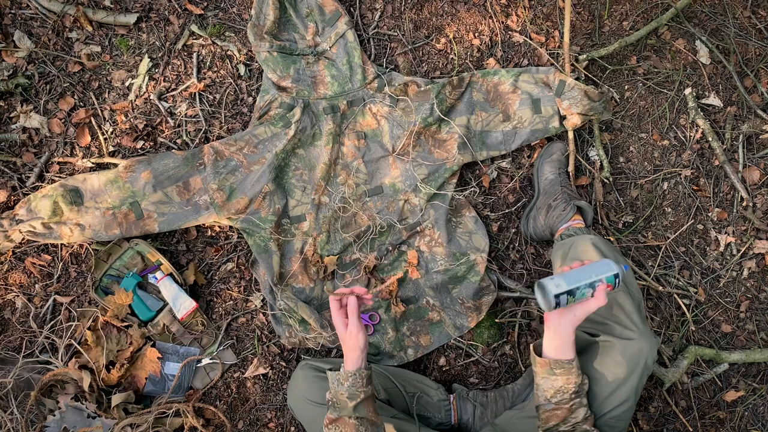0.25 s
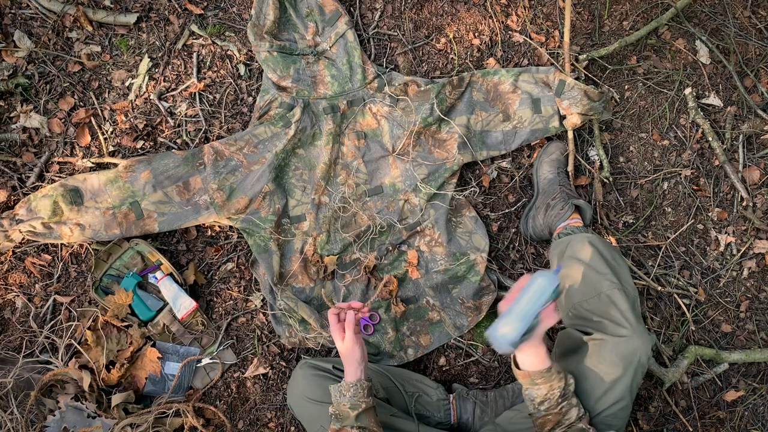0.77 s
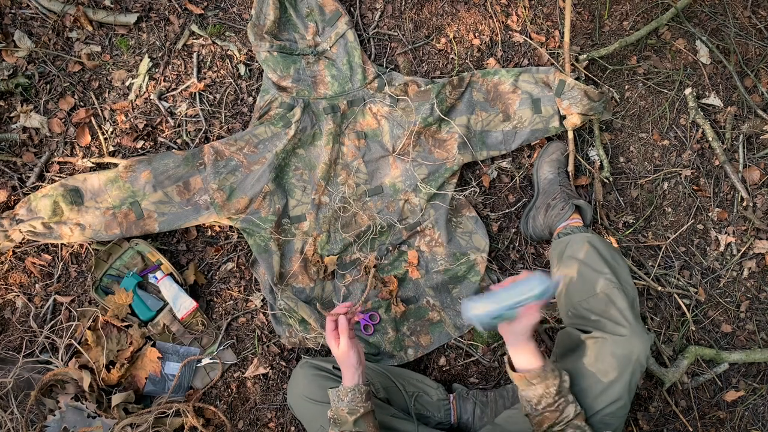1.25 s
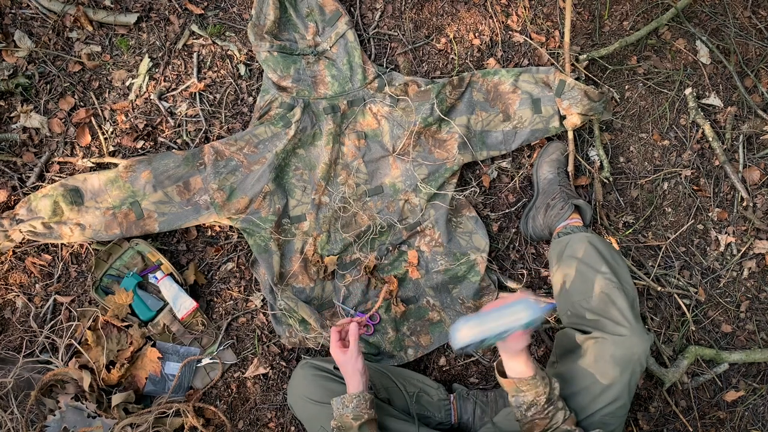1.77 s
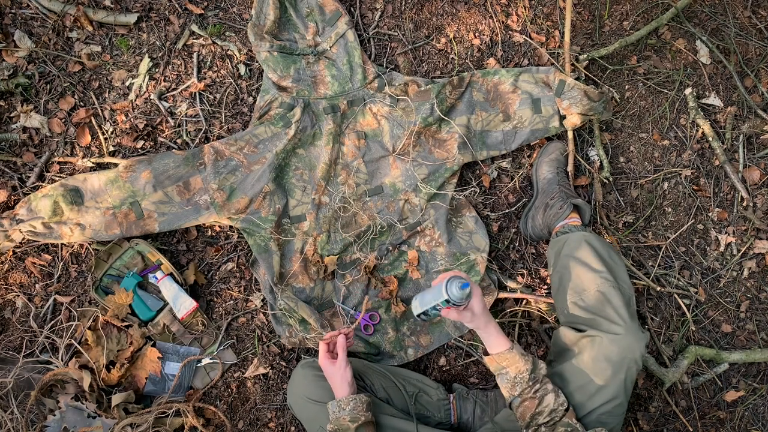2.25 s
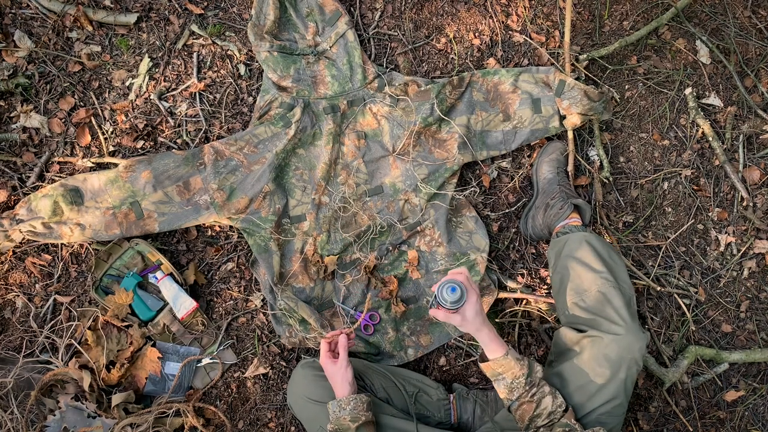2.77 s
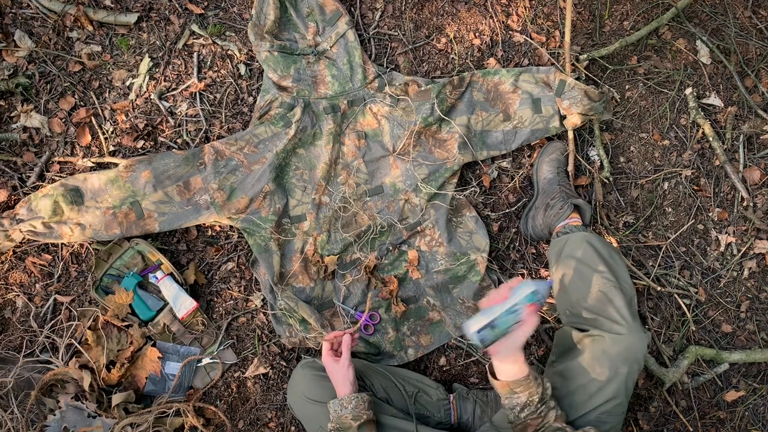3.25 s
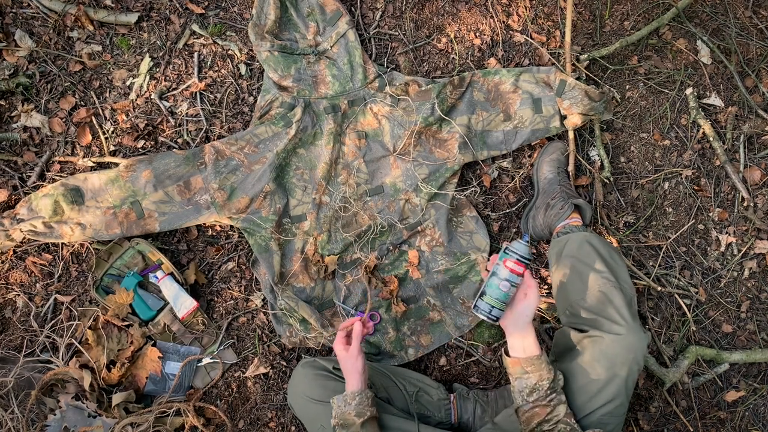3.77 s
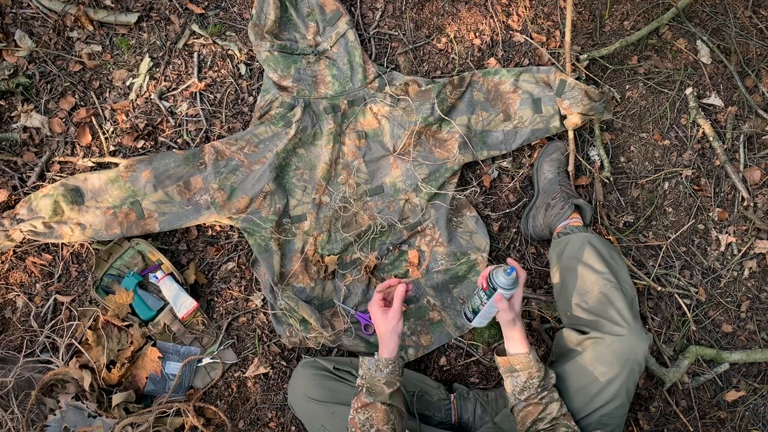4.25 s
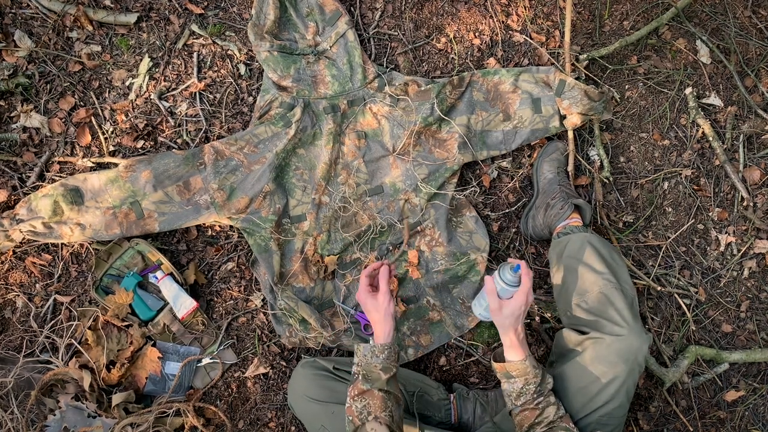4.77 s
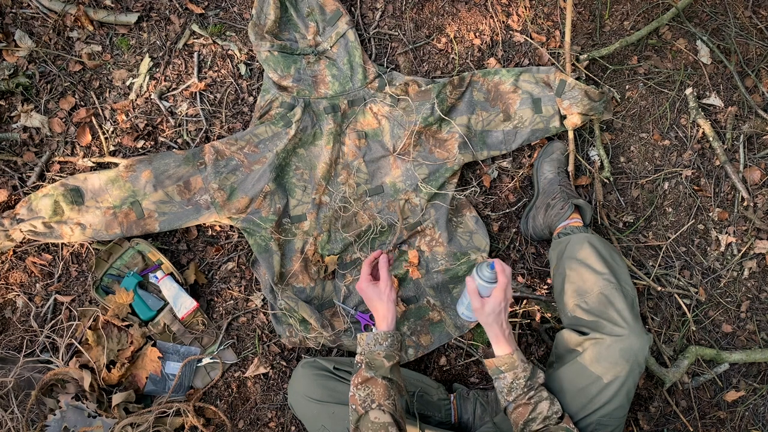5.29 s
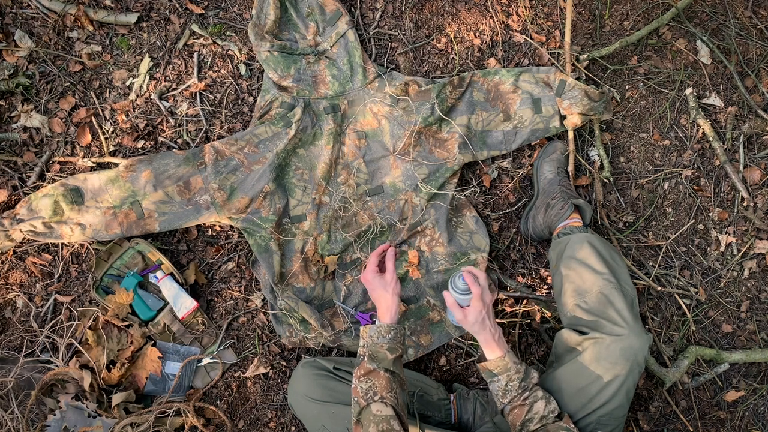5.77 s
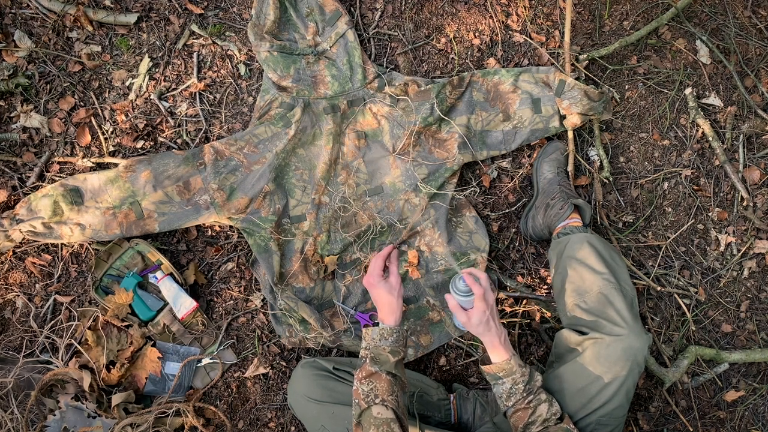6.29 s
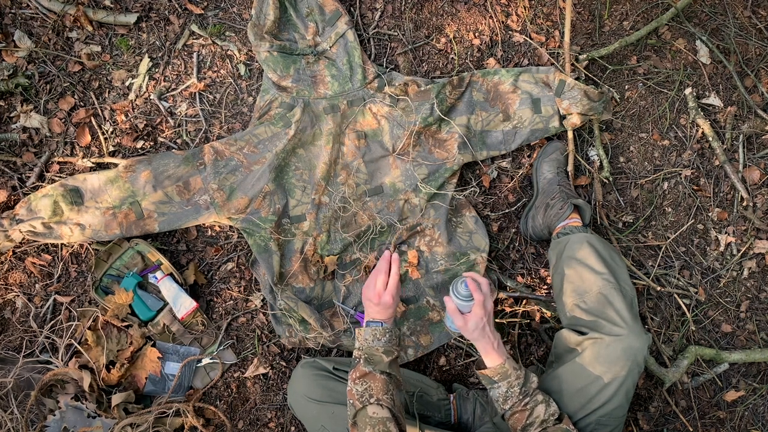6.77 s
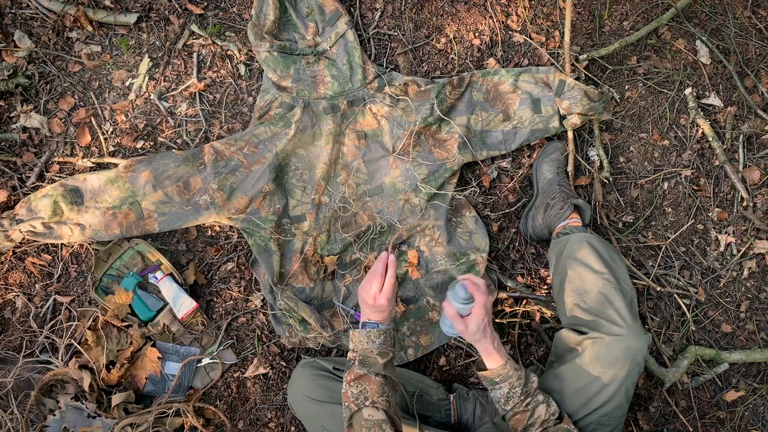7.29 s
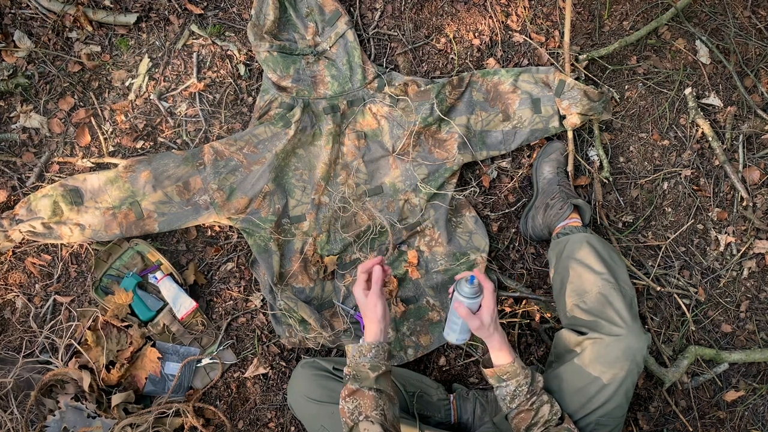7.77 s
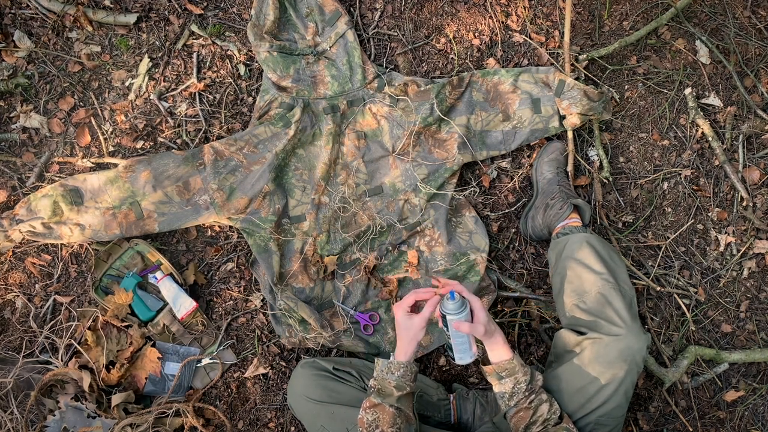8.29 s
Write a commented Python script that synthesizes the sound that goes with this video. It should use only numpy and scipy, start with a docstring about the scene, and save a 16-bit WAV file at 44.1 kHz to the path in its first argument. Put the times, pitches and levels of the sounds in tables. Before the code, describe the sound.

From the very start a spray can is shaken hard close to a small stereo microphone in quiet woodland. The mixing ball strikes with dense, irregular, hollow metallic clacks, damped by paint, with tiny skittering ticks and liquid slosh between. The rattle is strongest until about 2 s, then weakens to sparse light clicks by 2.5 s. After a short gap with faint bird whistles and a soft low bump near 3 s, a second bout rattles loudly around 3.3-3.7 s and dwindles by 4.4 s. Quiet follows, with distant birds and a low thump at 4.9 s. Four bright, airy spray hisses come next: short ones at 5.5 and 5.8 s, longer ones at 6.15-6.6 and 6.9-7.35 s, each cut off quickly. The last second holds gentle birdsong, low rumble, faint air and soft bumps from about 7.9 s.

```python
"""Over a low woodland rumble with far birdsong, a spray can is shaken hard from the outset, in two bouts.
Its mixing ball strikes the paint-damped wall and domed ends, each blow a broad clack with decaying modes;
meanwhile the ball skitters in tiny ticks and paint sloshes as shaped noise. Soft bumps, decaying low tones,
come from about 3 s on. From 5.5 s four short jets follow, turbulent noise gated by the valve.
A small two-port microphone takes it all in, and a tone curve with two dips in the treble colours it."""
import sys
import numpy as np
from scipy import signal
from scipy.fft import rfft, irfft, next_fast_len
from scipy.io import wavfile
from scipy.ndimage import uniform_filter1d, map_coordinates

SR = 44100
rng = np.random.default_rng(int(sys.argv[2]) if len(sys.argv) > 2 else 0)


def wav_out(sig):
    """Save sig, one row per channel (or a flat mono array), as 16-bit PCM at SR to the path in sys.argv[1]."""
    wavfile.write(sys.argv[1], SR, np.round(np.clip(np.atleast_2d(sig).T, -1, 1) * 32767).astype(np.int16))


N = 376173


def amp(db):
    """Decibel law: level in dB to amplitude gain."""
    return 10 ** (np.asarray(db) / 20)


def unit(x):
    """Normalisation of a signal to rms 1."""
    return x / np.sqrt(np.mean(x ** 2) + 1e-20)


def along(points, hz):
    """Interpolation of (f/Hz, value) points on a logarithmic frequency axis."""
    f, v = np.transpose(points)
    return np.interp(np.log(hz + 1), np.log(f + 1), v)


def curves(rows):
    """Linear interpolation in time: one value per sample for each column after t/s."""
    s, *cols = np.transpose(rows)
    return [np.interp(np.arange(N) / SR, s, c) for c in cols]


def wander(step):
    """Smooth random modulation: a spline through one normal draw every step samples."""
    return map_coordinates(rng.standard_normal(N // step + 4), [np.arange(N) / step])


def gate(spans, open_s, shut_s):
    """Envelope of 1 inside the spans: quadratic rise in open_s, exponential fall of 60 dB in shut_s."""
    t = np.arange(N) / SR
    envelope = 0
    for start, end in spans:
        rise = np.clip((t - start) / open_s, 0, 1) ** 2
        fall = amp(-60 * np.clip(t - end, 0, 9) / shut_s)
        envelope = envelope + rise * fall
    return envelope


def filtered(x, response):
    """Linear filtering: the spectrum of x times a complex response of frequency."""
    m = next_fast_len(N + SR // 2)
    return irfft(rfft(x, m) * response(np.fft.rfftfreq(m, 1 / SR)), m)[..., :N]


def patchy(channels, patchy_db):
    """Non-stationary noise: white, with shared patches of random gain (rms patchy_db) in time and frequency."""
    z = signal.stft(rng.standard_normal((channels, N)), nperseg=512)[2]
    over_hz = uniform_filter1d(rng.standard_normal(z.shape[1:]), 6, 0)
    field = uniform_filter1d(over_hz, 8, 1)
    return signal.istft(z * amp(patchy_db * unit(field)), nperseg=512)[1][:, :N]


def ring(hz, t60, t):
    """Free vibration of one mode, falling 60 dB in t60 seconds."""
    return np.sin(2 * np.pi * hz * t) * amp(-60 * t / t60)


# spectra of the background layers: f/Hz, relative level/dB (per Hz)
DEEP = [(18, -32), (32, -5.5), (55, 4.5), (90, -6.5), (160, -19.5), (300, -61.5)]  # deep rumble
WOOD = [(30, -37.5), (70, -16), (130, -8), (250, -8.5), (330, -6.5), (420, -10.5), (700, -13),
        (1190, -24.5), (1600, -33.5), (2400, -64.5)]  # far drone and leaves
AIR = [(900, -32), (1500, 3), (2300, -0.5), (4200, 4.5), (5400, -9), (9000, -7.5), (14000, -2), (16000, -8)]  # faint hiss
SHEEN = [(6000, -30), (10000, -12), (12500, 0), (15200, 1), (16500, -6)]  # highest hiss
# course of the deep rumble: t/s, level/dB
DEEP_LEVEL = [(0, -77), (1.3, -90), (2, -69.5), (4.5, -69), (6.2, -72), (8.5, -66)]
# likeness of left and right: f/Hz, correlation (1 alike, -1 opposed)
ALIKE = [(60, .9), (130, .8), (290, .55), (640, -.18), (1400, -.15), (3100, .2), (15000, .05)]


def woodland():
    """Diffuse field: rumble, drone and hiss whose interchannel correlation nears 1 only in the bass."""
    # mid and side in the ratio cos : sin of this angle give the wanted correlation
    turn = lambda f: np.arccos(np.clip(along(ALIKE, f), -1, 1)) / 2
    deep_db, = curves(DEEP_LEVEL)
    layers = 0
    for spectrum, db, patchy_db in [(DEEP, deep_db, 2.5), (WOOD, -65, 2.5), (AIR, -79, 2.2), (SHEEN, -77, 1.5)]:
        mid, side = filtered(patchy(channels=2, patchy_db=patchy_db),
                             lambda f: amp(along(spectrum, f)) * [np.cos(turn(f)), np.sin(turn(f))])
        layers = layers + amp(db) * unit(np.array([mid + side, mid - side]))
    return layers


# decay of the woodland echo: f/Hz, t60/s
TREES = [(300, .25), (2000, 0.18), (10000, 0.38)]


def trees(x):
    """Scattering: trunks and ground answer diffusely, each frequency with its own decay time."""
    hz, t, z = signal.stft(rng.standard_normal((2, SR // 2)), SR, nperseg=256)
    decay = amp(-60 * t / along(TREES, hz)[:, None])
    tail = signal.istft(z * decay, SR, nperseg=256)[1]
    delayed = np.pad(x, ((0, 0), (200, 0)))  # samples
    return signal.fftconvolve(delayed, tail / np.linalg.norm(tail[0]), axes=1)[:, :N]


# tone curve of the whole scene, with treble dips: f/Hz, gain/dB
TONE = [(5600, 0), (6600, 6), (6950, -5.5), (7350, -8), (7650, 3), (8400, 5.5), (10900, -0.5), (11350, -13),
        (12100, -29), (12550, -7.5), (13400, -14), (15400, -13), (16000, -27.5), (16800, -42.5)]


def tone(f):
    """Equalisation: gain of the tone curve at each frequency."""
    return amp(along(TONE, f))


# level difference of a near source: f/Hz, left over right/dB
LEAN = [(200, -1), (600, -2.5), (1500, -.6), (2600, -1), (4400, -4), (7000, -.5), (9000, .5), (15000, .8)]
# phase difference of a near source: f/Hz, lead of left over right/rad
LEAD = [(600, 0), (1900, -.5), (3100, .8), (4800, .6), (6550, -1.8), (8530, -5.5), (12300, -10.4),
        (16400, -15.2)]


def ports(x):
    """Interaural-like cues: a near source reaches the two ports differing in level and phase."""
    half = np.array([[.5], [-.5]])
    return filtered(x, lambda f: amp(half * along(LEAN, f)) * np.exp(1j * half * along(LEAD, f)))


# low bumps at the microphone: t/s, bump level/dB, bump f/Hz, rustle level/dB
BUMPS = [(2.882, -41, 49, -91.5), (3.002, -31.5, 60, -73.5), (4.854, -33, 73.6, -51),
         (5.569, -36.5, 74, -56), (7.921, -39.5, 55.2, -89.5), (8.08, -41, 55, -88),
         (8.26, -43.5, 65, -95.5)]


def bumps():
    """Damped oscillation: soft low pushes of a few cycles, with a dull, slower-fading rustle."""
    out, rustle, t = np.zeros(N + SR), np.zeros(N + SR), np.arange(SR // 2) / SR
    for s, bump_db, hz, rustle_db in BUMPS:
        span = slice(round(s * SR), round(s * SR) + len(t))
        out[span] += amp(bump_db) * ring(hz, 0.097, t) * (1 - np.exp(-t / 0.024))
        rustle[span] += amp(rustle_db - 60 * t / .6) * (1 - np.exp(-t / .005))
    dull_points = [(60, -18), (350, -0.5), (900, -10.5), (1500, -33.0), (4000, -62)]  # f/Hz, level/dB
    dull = filtered(patchy(channels=2, patchy_db=2.5), lambda f: amp(along(dull_points, f)))
    # adding the swapped channels makes left and right more alike
    return out[:N] + rustle[:N] * unit(dull + .7 * dull[::-1])


# bird whistles: t/s, length/s, start f/Hz, end f/Hz, bend (0 straight, + arches, - sags), level/dB
BIRDS = [(2.134, 0.1, 3260, 3220, -0.018, -65), (2.257, 0.104, 3010, 3115, 0, -57.5),
         (2.57, 0.12, 1837, 1990, 0.012, -79), (2.73, .12, 3630, 3570, 0.033, -84),
         (2.92, 0.098, 3246, 3230, 0.0059, -67.5), (2.945, 0.2, 2212, 2170, 0, -70),
         (4.752, .07, 3200, 3170, 0.011, -80.5), (4.81, 0.069, 4240, 2884, -0.099, -71.5),
         (4.883, 0.13, 3060, 3000, -0.0054, -83.5), (5.0, .06, 4670, 3850, -0.049, -79),
         (5.06, 0.26, 3107, 3285, 0.076, -77), (5.314, 0.13, 3292, 2080, -0.074, -73.5),
         (5.99, 0.065, 1780, 2000, -0.011, -74), (6.089, 0.072, 2050, 1906, -0.029, -71),
         (6.39, .065, 3060, 3130, 0, -61.5), (7.5, 0.18, 2407, 2308, -0.018, -78),
         (7.59, 0.046, 4210, 4110, -0.016, -79.5), (7.7, .061, 1963, 1970, -0.01, -77.5),
         (7.715, 0.11, 3030, 2700, 0.017, -79), (7.78, .07, 2263, 2000, -0.037, -70),
         (7.869, 0.051, 2786, 2346, -0.024, -75), (7.87, 0.094, 3300, 3240, 0, -80.5),
         (7.94, 0.16, 2263, 2275, -0.0052, -74.5), (7.94, 0.11, 3820, 3800, 0, -80),
         (8.0, .07, 2950, 2670, 0.027, -74.5), (8.118, 0.038, 2180, 2110, 0, -78),
         (8.26, .14, 2925, 2300, .1, -74.5), (8.26, 0.072, 4700, 4600, 0, -77.5),
         (8.32, 0.038, 7600, 7800, .02, -82.5), (8.391, 0.13, 2286, 2243, 0, -74.5)]


def birds():
    """Frequency modulation: gliding whistles, each with its own phase between ports, over a faint chorus."""
    out = np.zeros((2, N + SR))
    far = rng.random((260, 5))
    far_hz = 1700 + 3000 * far[:, 2]
    far_end_hz = far_hz * (1 - .1 * far[:, 3] ** 2)
    chorus = np.transpose([far[:, 0] * N / SR, .04 + .1 * far[:, 1], far_hz, far_end_hz,
                           0 * far_hz, -93 + 7 * far[:, 4]])
    for s, length, start_hz, end_hz, bend, db in [*BIRDS, *chorus]:
        u = np.arange(round(length * SR)) / (length * SR)  # 0 to 1 through the note
        hz = (start_hz + (end_hz - start_hz) * u) * (1 + bend * 4 * u * (1 - u))
        side, knots = rng.uniform(-1, 1), rng.standard_normal((2, 64))
        # moving air and leaves make pitch and level waver
        pitch_waver, level_waver = [map_coordinates(k, [150 * u * length]) for k in knots]
        phase = 2 * np.pi * np.cumsum(hz * (1 + .008 * pitch_waver)) / SR
        swell = np.sin(np.pi * u ** .8) ** .6 * amp(4 * level_waver)
        note = np.sin(phase + 1.1 * np.array([[side], [-side]])) * swell
        out[:, round(s * SR):][:, :len(u)] += amp(db) * note
    return out[:, :N]


# nozzle presses: valve opens t/s, valve shuts t/s, level/dB, drift/(dB per s)
PRESSES = [(5.53, 5.692, -48, -7.5), (5.814, 5.972, -47.5, 7), (6.145, 6.575, -46, -10.5),
           (6.914, 7.356, -48.5, -4.5)]
# spectrum of the jet: f/Hz, relative level/dB (per Hz)
NOZZLE = [(500, -31), (1250, -27), (2800, -19), (4000, -11), (5000, -5), (6200, -11.5), (9000, -5),
          (16000, 12.5)]
OPEN_S, SHUT_S = 0.0045, 0.051  # rise time; time to fall 60 dB
SURGE_DB, SURGE_S = 3, .05  # extra level just after opening, and its time constant
CHOKE_DB, CHOKE_S = 4.5, 0.019  # the same just before shutting
LOW_HISS_DB, LOW_GROWS = -15.5, 0.37  # low hiss against the jet; its extra dB per dB of surge
FLUTTER_DB = 0.5  # unsteady flow


def spray():
    """Turbulent jet noise, partly unlike at the ports; it surges and darkens while the valve is half open."""
    t, flow, surge_db = np.arange(N) / SR, 0, 0
    for opens, shuts, db, drift in PRESSES:
        since = np.clip(t - opens, 0, shuts - opens)
        until = np.clip(shuts - t, 0, shuts - opens)
        edge_db = SURGE_DB * np.exp(-since / SURGE_S) + CHOKE_DB * np.exp(-until / CHOKE_S)
        held = gate([(opens, shuts)], OPEN_S, SHUT_S)
        flow = flow + held * amp(db + drift * since + edge_db)
        surge_db = surge_db + held * edge_db
    flutter = wander(1500)
    noise = patchy(channels=2, patchy_db=2.0)
    white = noise[0] + 0.36 * noise[1] * [[1], [-1]]
    # the tone curve acts before levelling, so the levels hold for the coloured jet
    pair = filtered(white, lambda f: amp(along(NOZZLE, f)) * tone(f))
    low = filtered(pair, lambda f: 1 / (1 + (f / 3500) ** 4))
    hiss = unit(pair) + amp(LOW_HISS_DB + LOW_GROWS * surge_db) * unit(low)
    return flow * amp(FLUTTER_DB * flutter) * hiss


# how hard paint and ball move: t/s, level/dB
SHAKE = [(0.0, -44.5), (0.11, -53.5), (0.26, -57), (0.59, -63), (1.0, -49.5), (1.14, -50.5), (1.25, -48.5),
         (1.46, -47.5), (1.86, -48.5), (2.04, -56), (2.42, -75), (2.61, -69.5), (2.9, -79), (3.18, -85.5),
         (3.3, -52), (3.51, -53.5), (3.64, -57.5), (3.75, -61), (3.89, -66.5), (4.13, -74.5), (4.25, -65),
         (4.45, -80)]
# spectrum of the slosh: f/Hz, relative level/dB (per Hz)
SLOSH = [(600, -44.5), (1200, -17.5), (3500, 7), (6000, -3.5), (9000, -9.5), (16000, -3.5)]
SKITTER_DB, SLOSH_DB = -5.5, -4.5  # relative to the shaking level


def shaking():
    """Modal excitation by random impacts: the ball skitters along the wall in tiny ticks while paint sloshes."""
    shake_db, = curves(SHAKE)
    struck = rng.random(N) < 400 / SR  # 400 ticks a second on average
    ticks = struck * amp(6 * rng.exponential(size=N).clip(0, 3)) * rng.standard_normal(N)
    t = np.arange(SR // 20) / SR
    wall = ring(1700, .018, t) + 1.1 * ring(2000, .025, t) + 0.41 * ring(1400, .025, t) + 0.36 * ring(2500, .03, t)
    skitter = unit(signal.fftconvolve(ticks + 0.15 * rng.standard_normal(N), wall)[:N])
    # the slosh comes in quick uneven gulps
    gulps = amp(4 * wander(400))
    # and all moves in slower waves from end to end of the can
    waves = amp(3 * wander(2500))
    fizz = unit(gulps * patchy(channels=1, patchy_db=1.5)[0]) + 0.84 * unit(ticks)
    slosh = unit(filtered(fizz, lambda f: amp(along(SLOSH, f))))
    moving = gate([(-.1, 2.6), (2.98, 4.8)], 0.022, 0.099)
    return moving * waves * amp(shake_db) * (amp(SKITTER_DB) * skitter + amp(SLOSH_DB) * slosh)


# ball knocks: t/s, wall level/dB, dome over wall/dB, click over wall/dB, wall f/Hz
KNOCKS = [(0.0185, -36, -12.5, -10, 1580), (0.0447, -19, 7, 4.5, 1840), (0.0744, -26, -12, -9, 1640),
          (0.1218, -22, -10.5, -5.5, 1790), (0.1434, -19.5, -26, -10, 1320), (0.16, -16.5, -11.5, 2, 1720),
          (0.2447, -17, -25, -10, 1750), (0.2778, -11, -7, -10.5, 1750), (0.298, -29.5, 0, -7, 1700),
          (0.394, -15.5, -22.5, -16, 1920), (0.4567, -11.5, -29.5, -22.5, 1745),
          (0.504, -53, -12.5, 6, 1710), (0.5422, -31, -21, -11, 1870), (0.594, -26.5, -28, -16, 1620),
          (0.633, -32, -15, -12, 1660), (0.661, -27, -3, -4, 2240), (0.7516, -19, -19.5, -14, 1580),
          (0.7871, -39, -26, -5, 2580), (0.8072, -15, -23, -17.5, 1650), (0.829, -25, -7, -5, 2530),
          (0.84, -25.5, 1.5, -5, 2450), (0.8596, -24.5, -3.5, -2, 2720), (0.8847, -29, -1, -1.5, 1670),
          (0.9012, -24.5, -17, -9.5, 1750), (0.9416, -15, -20, -17, 1940), (0.9556, -22.5, -25, -15, 1610),
          (1.0334, -40, -13, -7, 1320), (1.0751, -17.5, -5, -1, 1380), (1.1074, -39, -13, 0, 2220),
          (1.119, -34, -15, -7, 2100), (1.1274, -40, -9, -1, 2500), (1.1489, -19, -13.5, -5, 1854),
          (1.1757, -25, -34, -10, 1580), (1.181, -32.5, -2, -2, 2600), (1.2018, -34.5, -13, 3, 2550),
          (1.2324, -17.5, -15.5, -7.5, 1830), (1.268, -15.5, -14, -8.5, 1635),
          (1.2894, -24.5, -16, 0, 2480), (1.3079, -27.5, -7.5, -6.5, 2150),
          (1.3476, -19.5, -30, -22.5, 2020), (1.3743, -39, -32, -11, 1750), (1.3828, -33, -2, -1, 1830),
          (1.407, -30.5, -35, -11, 1600), (1.4903, -38, -18, -2, 1650), (1.5818, -22.5, -3, 0, 1810),
          (1.6067, -20, -19, -16, 1580), (1.618, -26, -23, -12, 1690), (1.658, -16, 4.5, -1.5, 1690),
          (1.6729, -21, 2.5, -1, 1890), (1.6901, -34.5, -13.5, -11, 1740), (1.697, -28, -24, -15, 1680),
          (1.7034, -35.5, -12.5, -4, 1680), (1.7617, -21, 3, 2, 1680), (1.7823, -32.5, -9, -8, 1760),
          (1.7951, -26, -29, -11.5, 1860), (1.8045, -29.5, -28, -19, 1610), (1.864, -28, -8, -14, 1700),
          (1.8808, -14.5, -2, 1.5, 2620), (1.906, -21.5, -8.5, -16, 1580), (1.921, -27.5, -18, -12, 1520),
          (1.935, -32, -10, -4.5, 1600), (1.9653, -34.5, -15, -12, 1600), (1.9954, -24.5, 1, -1.5, 2400),
          (2.0176, -32, -12, -8, 1660), (2.0345, -32, -31, -11, 1810), (2.0496, -37, -11.5, -20, 1740),
          (2.1035, -45, -25, -6, 1810), (2.1171, -44, -31, -12, 1900), (2.2281, -34.5, 4, -0.5, 1840),
          (2.3495, -41.5, 9, -1.5, 2440), (2.428, -37.5, -4, -14, 2500), (2.4433, -45, 5.5, -4, 2200),
          (2.501, -49.5, 5, -11, 2390), (2.5086, -46, -3, -4, 2060), (2.537, -58, 10, -15, 2530),
          (2.5549, -50, 4.5, -20, 2650), (2.8925, -52.5, -1, -8, 2516), (3.048, -27.5, -18, -20, 1910),
          (3.1006, -47.5, -6, -14, 1960), (3.1279, -24, -3.5, -6.5, 1760), (3.1685, -42.5, 3, 0, 2490),
          (3.248, -25, -23, -17, 1640), (3.2919, -15.5, 2, -3.5, 1694), (3.3223, -19, -1.5, -4.5, 1800),
          (3.3416, -27.5, -13, -15, 1710), (3.3909, -12.5, -7, -10, 1840), (3.4297, -17, -22, -16, 1670),
          (3.4631, -25, -7, -12, 1620), (3.485, -16, -6.5, -3, 1810), (3.5081, -20, -2, -7.5, 1900),
          (3.5744, -22, -22, -13.5, 1770), (3.6429, -15, -44, -22, 1720), (3.6504, -30.5, 4, 2, 1860),
          (3.6665, -25, -20, -15, 1960), (3.689, -31, -20, -12, 2200), (3.7012, -34, -19, -11.5, 2200),
          (3.8394, -27.5, 9.5, 2.5, 2700), (3.8723, -31.5, -24, -12.5, 2030),
          (3.913, -40.5, -13.5, -10.5, 1780), (4.045, -37, -18.5, -15, 1900), (4.0766, -30, 2, 1.5, 1970),
          (4.0969, -33.5, -27, -12, 2080), (4.155, -34, -15, -7.5, 1940), (4.2202, -29, -4.5, -6, 2460),
          (4.2586, -52, 2, -10, 2500), (4.2843, -48, -4, -10, 2500), (4.2994, -52, -7.5, -22, 2530),
          (4.349, -37.5, -13.5, -24.5, 2070), (4.3829, -52.5, -18, -13, 1990),
          (4.4097, -47.5, -1, -16, 2430), (4.4318, -52.5, -5.5, -24, 2522), (4.9592, -63, -13, -7.5, 1870),
          (5.2988, -56.5, -10.5, -15.5, 1960)]
# modes of the domed ends: f/Hz, t60/s; hard knocks favour the first, soft ones the second
DOME = [(3930, 0.032), (4500, .03)]
WALL_RING_DB, DOME_RING_DB, CLACK_DB = -5, 0, 7.5  # offsets of the tonal rings and the broad clack
SWAY_DB, SWAY_SAMPLES = 2, .4  # the can turns in the hand: scatter of left-right level and delay


def knocks():
    """Impact and modal decay: a sharp broad clack, a short ring of wall and dome, and a damped clatter."""
    out, t = np.zeros((2, N + SR)), np.arange(4096) / SR
    hz = np.fft.rfftfreq(len(t), 1 / SR)
    for s, wall_db, dome_over_db, click_over_db, wall_hz in KNOCKS:
        dome_db, click_db = wall_db + dome_over_db, wall_db + click_over_db
        chance, noise = rng.standard_normal(4), rng.standard_normal(len(t))
        # close mode pairs beat, as the seam of the can splits them
        wall = ring(wall_hz, .019, t) + .5 * ring(wall_hz * (1 + .06 * chance[0]), .024, t)
        hard = np.clip((dome_db + 38) / 14, 0, 1)  # 0 soft, 1 hard
        detune = 1 + .012 * chance[1:]
        dome = sum(share * ring(mode_hz * c, t60, t)
                   for share, c, (mode_hz, t60) in zip([hard, 1 - 0.68 * hard], detune, DOME))
        # the many paint-damped modes merge into a clack and a weaker clatter
        struck_db = along([(250, wall_db - 35.0), (800, wall_db - 17), (1250, wall_db - 10.5),
                           (1800, wall_db - 2.5), (2900, (wall_db + dome_db) / 2 - 0.5),
                           (4000, dome_db + 0.12), (6500, click_db - 5), (14000, click_db + 10)], hz)
        # each landing spot favours other modes
        struck_db += 2.6 * np.interp(hz, np.linspace(0, SR / 2, 40), rng.standard_normal(40))
        spike = noise * amp(-60 * t / .0015)
        clatter = noise * (0.7 * amp(-60 * t / 0.014) + 0.12 * amp(-60 * t / 0.091))
        # the paint soaks up the treble of the clatter
        damped = amp(along([(4500, 3.5), (8000, -2.5)], hz))
        burst = 3.2 * rfft(spike) / np.linalg.norm(spike) + damped * rfft(clatter)
        fade_end = np.clip((t[-1] - t) / .02, 0, 1)
        clack = irfft(burst * amp(struck_db)) * fade_end
        blow = amp(wall_db + WALL_RING_DB) * wall + amp(dome_db + DOME_RING_DB) * dome + amp(CLACK_DB) * clack
        onset = 1 - np.exp(-t / 0.00027)
        lean_db, lag = rng.standard_normal(2) * [SWAY_DB, SWAY_SAMPLES]
        for port, side, late in zip(out, [.5, -.5], [0, round(lag)]):
            port[round(s * SR) + late:][:len(t)] += amp(side * lean_db) * blow * onset
    return out[:, :N]


def scene():
    """Superposition of direct and scattered sound: can in the hand, birds among the trees."""
    can, jet, song = knocks() + shaking(), spray(), birds()
    # far birds reach the ports mostly by way of the trees
    echoes = trees(amp(-18) * can + amp(1) * song)
    heard = ports(can) + echoes + amp(-3) * song + woodland() + bumps()
    # the jet already carries the tone curve
    return filtered(heard, tone) + ports(jet) + amp(-25.0) * trees(jet)


def record(dry):
    """Soft saturation and band limiting: loud peaks round off below 0.97, nothing passes above 16.8 kHz."""
    rounded = dry / (1 + np.abs(dry / .97) ** 6) ** (1 / 6)
    return filtered(rounded, lambda hz: hz < 16800)


dry = scene()
out = record(dry)
wav_out(out)
```